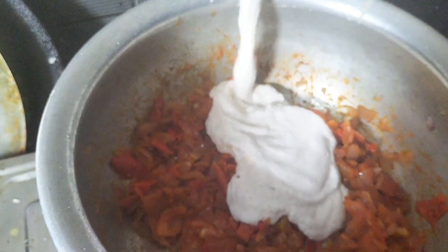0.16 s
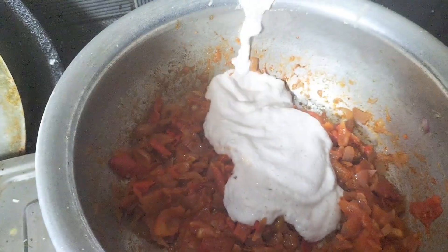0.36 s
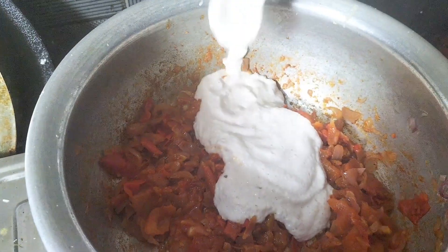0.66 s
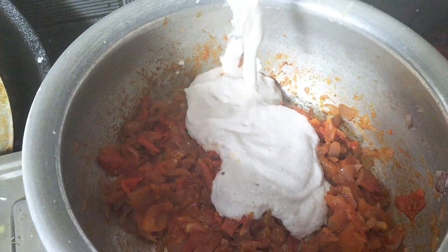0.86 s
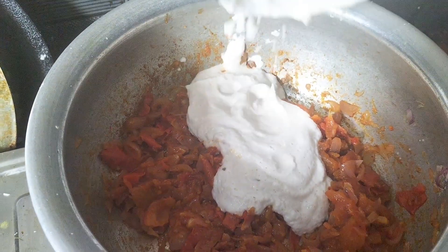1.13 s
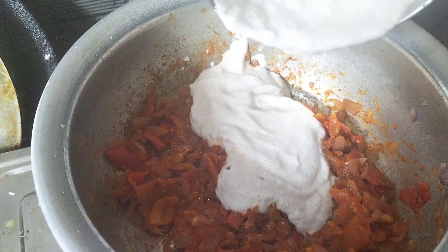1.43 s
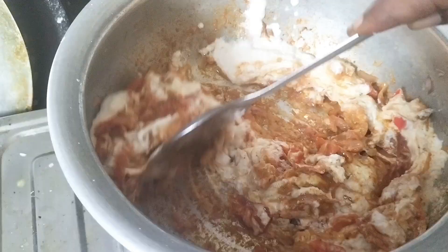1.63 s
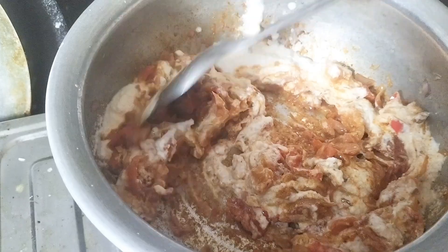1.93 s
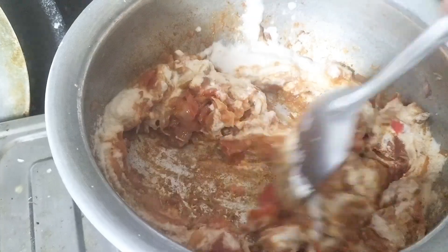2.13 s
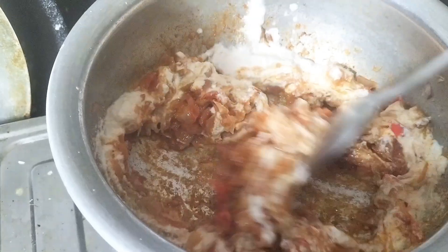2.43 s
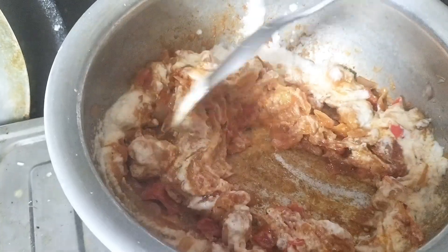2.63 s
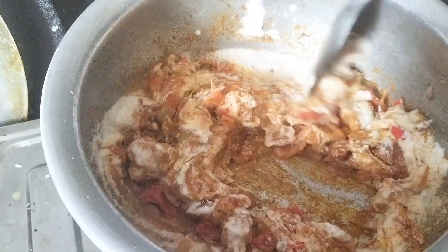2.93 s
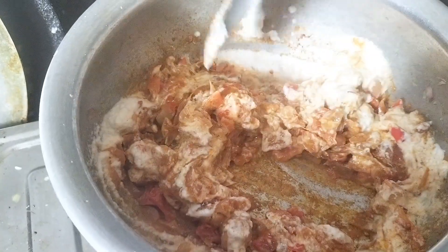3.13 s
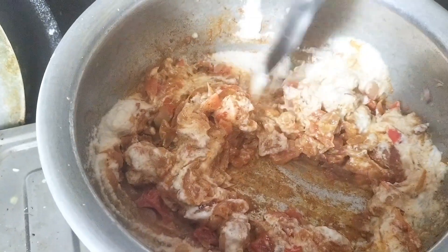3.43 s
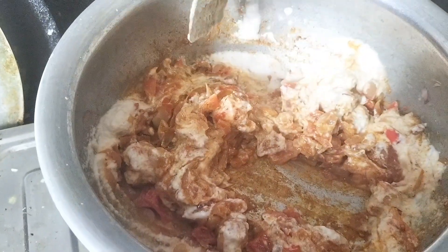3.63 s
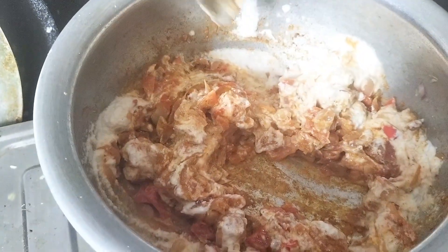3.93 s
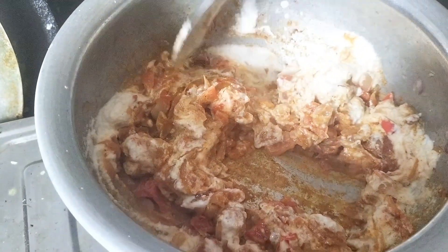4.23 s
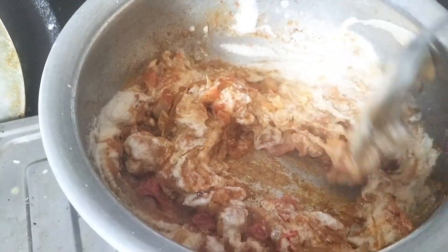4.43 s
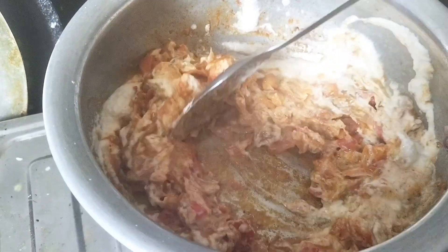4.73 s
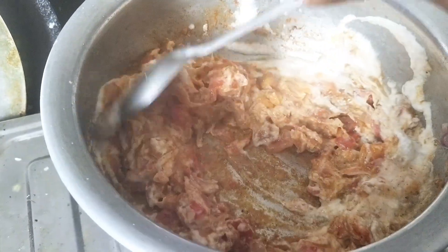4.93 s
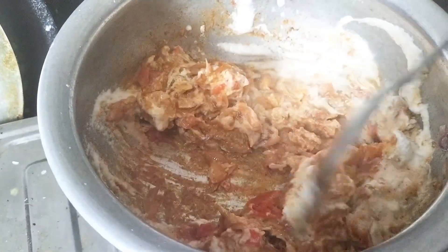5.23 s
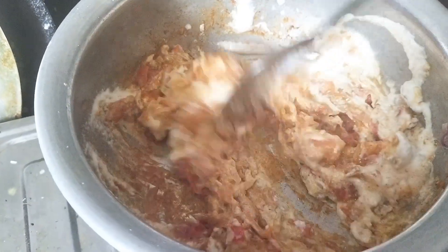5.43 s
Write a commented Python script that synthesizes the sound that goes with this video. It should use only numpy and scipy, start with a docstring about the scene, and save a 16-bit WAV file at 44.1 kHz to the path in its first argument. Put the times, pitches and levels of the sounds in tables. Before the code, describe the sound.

Steady fizzing oil with tiny bubbles opens the scene, smothered gradually by thick paste. A brief instant of dropout precedes the stirring. Then irregular spoon knocks, some muffled by food, some clear and ringing on the rim, mix with short rasps and tiny metallic squeaks. Hard kitchen walls add a short echo; close phone microphone, little deep bass.

```python
"""Paste smothering a sizzling pan

Coconut paste lands in a hot pan of oily masala: showers of tiny clicks fizz, bubble and slowly die down.
A steel spoon knocks on the aluminium pot, drags along the wall and is scraped clean on the rim.
Knocks are fading tones and noise; strokes and squeals are rubbing that sets metal ringing.
Food damps the ring, a small kitchen echoes the spoon, and a phone close by rounds the peaks."""
import sys
import numpy as np
from scipy import signal
from scipy.fft import rfft, irfft, next_fast_len
from scipy.io import wavfile
from scipy.ndimage import uniform_filter1d, map_coordinates

SR = 44100
rng = np.random.default_rng(int(sys.argv[2]) if len(sys.argv) > 2 else 0)


def digitize_waveform(pressure):
    """Quantize a signal to 16-bit integers and store it at the path in sys.argv[1].

    Rows of a 2-D input are taken as channels; values are limited to [-1, 1].
    """
    field = np.atleast_2d(pressure).T
    bounded = np.clip(field, -1, 1)
    quanta = np.round(bounded * 32767).astype(np.int16)
    wavfile.write(sys.argv[1], SR, quanta)


N = 245355
TIME = np.arange(N) / SR

# strength of the sizzle while the paste is poured and first turned over: time_s, level_db
SIZZLE_STRENGTH = [(0.0, -27), (0.03, -29), (0.08, -27), (0.38, -29), (0.79, -26), (1.11, -32),
                   (1.669, -34), (1.7, -33), (2.05, -36)]
# fine spray grows as the paste spreads over hot oil, then dies first: time_s, level_against_sizzle_db
SPRAY_STRENGTH = [(0, -17.5), (.88, -11.5), (1.8, -16), (3.8, -22.5)]
# loud spits of oil: start_s, relative_level_db
OIL_SPITS = [(0.084, -19), (0.12, -19), (0.202, -21), (0.496, -22.5), (0.792, -21), (0.862, -21)]
# colour of hot oil frying: frequency_hz, gain_db
FRYING_COLOUR = [(40, -38), (90, -31), (170, -16.5), (250, -24), (350, -11), (560, -16.5), (1040, -15.5),
                 (1210, -16.5), (1420, -17.5), (1950, -16), (3100, -3.5), (3950, 5.5), (4900, -1.5),
                 (6200, -4), (9500, -28.5), (11800, -24.5), (16000, -35)]
# colour of the quiet simmer under the paste: frequency_hz, gain_db
SIMMERING_COLOUR = [(40, -37), (90, -14.5), (215, -9.5), (330, 1.5), (560, -5), (1150, -9), (1850, -12.5),
                    (2700, -4), (4000, -3), (5700, -14), (7800, -26), (9700, -33), (11800, -34),
                    (16000, -36)]
# registers of spluttering, sizzle and fine spray: low_hz, high_hz
FRYING_BANDS = [(20, 2000), (2000, 7500), (7500, 20000)]
# borders between the registers that flare up on their own: frequency_hz
FLARE_BORDERS = [20, 700, 1500, 2600, 3500, 4500, 5800, 20000]
# spoon knocks: start_s, relative_level_db, paste_under_spoon (0-1), depth (0 rim - 1 bottom), thud_hz,
# after_ring_db, choke_s (extra t60 with which the food chokes the ring)
SPOON_KNOCKS = [(2.1115, -10, 0.76, 0.073, 992, -6, 0.47), (2.3933, -16, 0.23, 0.01, 1170, 3.5, 3.5),
                (2.402, -19.5, 0.39, .01, 1200, 4.5, 1.2), (2.46, -9, 0.63, 0.51, 703, 10.5, 0.16),
                (2.539, -18.5, 0.33, 0.36, 1050, 4, 0.12), (2.8543, -14.5, 0.12, 0.44, 1132, 8.5, 0.086),
                (2.911, -24.5, .15, 0.11, 1180, -1.5, 0.12), (2.931, -34, 0.17, 0.078, 1120, -17, .2),
                (3.2513, -16, 0.18, 0.16, 1125, 1.5, 9.5), (3.368, -18.5, 0.24, 0.9, 1140, 10, 3.6),
                (3.6237, -13.5, 0.2, 0.09, 1174, 1, 19), (4.01, -23, 0.35, 0.011, 1010, 5, 1.2),
                (4.2483, -12.5, 0.2, 0.2, 1120, 4, 0.7), (4.3089, -17.5, 0, 0.25, 1140, 4.5, 0.16),
                (4.3882, -27, 0.13, 0.32, 820, 6, .15), (4.416, -28, 0, 0.44, 1120, 6, 0.19),
                (4.4303, -15, 0.18, 0.29, 1140, 8, 0.75), (4.6203, -9.5, 0.36, 0.51, 1000, 2, 0.55),
                (4.709, -19.5, 0.22, 0.25, 630, 1.5, 0.064), (4.7439, -21, 0.68, 0.65, 662, -7, 0.23),
                (4.7787, -41.5, 0.45, 1, 500, 0, 0.25), (4.9953, -28, 0.45, 0.37, 365, 11, 0.56),
                (5.1, -40, 0.3, 0.94, 580, 20, 0.43), (5.3793, -8.5, 0.41, 0.51, 1144, -0.5, 0.52)]
# spoon strokes: start_s, length_s, relative_level_db, food_pushed (0-1), rasp_top_hz, chatter_hz,
# chatter_db, pot_ring_db
SPOON_STROKES = [(1.634, 0.056, -41, 1, 7040, 1050, 6, 5), (2.097, 0.1, -28, 0.91, 4060, 473, -5, -1.5),
                 (2.487, 0.043, -24.5, 0.42, 7300, 720, -16, -1),
                 (2.899, 0.064, -24.5, 0, 7000, 3850, 0, 8),
                 (2.935, 0.039, -27, 0.77, 6360, 1200, 1.5, 9.5),
                 (3.256, 0.15, -24.5, 0.41, 6500, 3100, -2.5, 16),
                 (3.32, 0.074, -22, 0.65, 6660, 4050, -3, 6), (3.967, 0.097, -28, 0.54, 5700, 3670, -1, -2),
                 (4.006, .04, -29, 0.26, 6460, 3390, 2.5, 7),
                 (4.259, 0.16, -25, 0.48, 6860, 1140, -2, 11.5),
                 (4.327, 0.15, -30.5, 0.38, 7400, 349.6, 3.5, 21),
                 (4.631, 0.092, -24.5, 0.7, 6900, 1145, -4, 7),
                 (4.996, 0.043, -31.5, 0, 6900, 1800, -3.5, 7), (5.109, 0.025, -28, 0.9, 5030, 3780, 5, 11),
                 (5.124, 0.056, -25.5, 0.61, 4630, 483.5, -6.5, 2),
                 (5.382, 0.09, -35, 0.77, 2480, 1585, 1.5, 24),
                 (5.42, 0.063, -23.5, 0.23, 5730, 3380, -8.5, -2.5)]
# squeals on bare metal: loudest_s, pitch_hz, relative_level_db, build_up_s, ring_t60_s
METAL_SQUEALS = [(2.537, 1165, -24, 0.0096, 0.039), (2.88, 362, -25.5, .012, 0.05),
                 (2.91, 328, -25, .012, 0.043), (3.385, 1415, -38, 0.032, 0.83),
                 (3.431, 2647, -38.5, 0.13, 0.28), (3.99, 1153, -30.5, 0.011, 0.18),
                 (4.014, 5795, -24, 0.0078, 0.28), (4.026, 1920, -18.5, 0.011, 0.17),
                 (4.314, 1152, -25, 0.011, 0.046), (4.36, 1166, -27.5, 0.021, 0.086),
                 (4.437, 1933, -28.5, 0.0066, .22)]
# partials of a squeal: multiple_of_pitch, level_db
SQUEAL_OVERTONES = [(1, 3.5), (2, -36)]
# colour of metal rubbing on metal: frequency_hz, gain_db
RUBBING_COLOUR = [(40, -29), (110, -73), (200, -7), (340, -4), (580, -6), (1130, 5.5), (1450, -0.5),
                  (2300, -4.5), (3900, -0.5), (6200, -7.5), (8000, -17.5), (9900, -28.5), (11800, -27.5),
                  (16000, -31)]
# ringing modes of pot and spoon: pitch_hz, relative_level_db, t60_s
POT_MODES = [(166.5, -3, 0.55), (331, 8, 0.48), (393.4, 1.5, 0.19), (414, -6, 0.5), (459, -2.5, 0.56),
             (481.6, -5.5, 0.34), (689.6, 2, 0.24), (759, 2, 0.45), (854, -9.5, 0.29), (1154, 1.5, 0.22),
             (1209, 1, 0.66), (1430, -8, 2.6), (1620, -10, 0.22), (1650, 2, 0.095), (1893, 2.5, 0.21),
             (2287, -10.5, 0.27), (2632, -7, 0.35), (3031, -3, 0.35), (3350, -14.5, 0.57),
             (3340, 2.5, 0.12), (3505, -2.5, 0.094), (3777, 3, 0.064), (4120, -9.5, 0.35), (4100, 8, 0.13),
             (4630, 0, 0.073), (4845, 6.5, 0.077), (5470, 0.5, 0.096), (5710, 4.5, 0.11), (6065, 7, 0.055),
             (6615, 2, 0.077), (7120, 1, 0.046), (8290, -6, 0.023)]
# bass, middle, treble and top of a knock: low_hz, high_hz
KNOCK_BANDS = [(100, 800), (800, 2200), (2200, 5000), (5000, 20000)]

# once it is stirred in, the sizzle dies away to a steady simmer
SMOTHER_DB_PER_S, SIMMER_DB = 11.5, -50
# low spluttering: its level against the sizzle, and what stays of it in the simmer
SPLUTTER_DB, SIMMER_SPLUTTER_DB = -8, -47.5
# steam bubbles through the edge of the paste on one wavering note
# (bend is a share of its pitch, dB is against the fizz)
BUBBLING_HZ, BUBBLING_T60_S, BUBBLING_BEND, BUBBLING_DB = 1200.4, 0.14, .035, -16
# each register of the sizzle flares up on its own
FLARE_DB, FLARE_PER_S = 1.7, 22

# tone of a knock: (bass, middle, treble, top) on the bare rim, and what full paste and full depth add
RIM_DB, PASTE_DB, DEPTH_DB = (-20, -17.5, 6.5, 0), (-9.5, 5, -13.5, -61), (25.5, 10, -21.5, 6)
# shifts of after-ring and squelch: (on the rim, at the bottom)
RING_DB, SQUELCH_DB = (9.5, -4), (-22, -6)
# wet, noisy share of a knock: (on bare metal, in thick paste)
WET_DB = (-9, -1)
# paste under the spoon cushions the blow: highest pitch on bare metal, octaves lost in thick paste
BARE_TOP_HZ, CUSHION_OCTAVES = 17000, 2.1
# the place of contact favours some modes over others (either way)
PLACE_DB = 3.5
# a load on the wall pulls each mode off its free pitch: largest share of the pitch,
# and the choke time above which the pot rings freely
LOAD_DETUNE, FREE_RING_S = .04, .7

# parts of a stroke against its rasp: (on bare metal, with a full spoon)
GRIT_DB, RUMBLE_DB = (-3.5, -17), (-22, 4)
# ringing pot against dry rubbing, before each stroke's own setting: (rasp, grit, rumble)
STROKE_RING_DB = (-4, -3, -7)
# pressure builds for this share of a stroke, then lets go; the hand judders
PRESS_SHARE, JUDDER_DB, JUDDER_PER_S = 0.47, 1, 114.8
# a chattering note lasts longer the lower it is (t60 at 1 kHz) and bends by a share of its pitch
CHATTER_T60_S, CHATTER_BEND = .09, .025
# the spoon's edge catches on burnt-on bits (dB is before the rubbing colour)
CATCHES_PER_S, CATCH_DB = 170, -5.5
# with a full load, the ring wavers by this share of its pitch as the point of contact slides
SLIDE_BEND, SLIDE_PER_S = .025, 35
SQUEAL_FALL_S = 0.0035

# the sound drops out briefly
GAP_START_S, GAP_END_S = 1.6185, 1.628
# highest pitch the phone lets through
TOP_HZ = 16200


def frying():
    """Steam bursts in the oil: fizz, crisp bubbles, a bubbling note and spits; stirring changes its colour."""
    fizz = level(clicks(rate=11000, spread_db=2), 0)
    crisp = level(bubbles(rate=700, low_hz=2930, high_hz=6250), -10.0)
    note = convolve(clicks(rate=270, spread_db=3.5), mode(BUBBLING_HZ, BUBBLING_T60_S))
    bubbling = level(bend(note, BUBBLING_BEND, rate=14), BUBBLING_DB)
    source = flare(fizz + crisp + bubbling)
    smothered = np.interp(TIME, [2.2, 3.8], [0, 1])
    hot = level(colour(source, FRYING_COLOUR), 0)
    simmer = level(colour(source, SIMMERING_COLOUR), 0)
    sound = (1 - smothered) * hot + smothered * simmer
    out = np.zeros(N)
    for edges, gain in zip(FRYING_BANDS, frying_levels()):
        part = band(sound, *edges)
        # even out the loudness over 0.2 s, then follow the wanted level
        loudness = np.sqrt(uniform_filter1d(part ** 2, SR // 5))
        out += part / loudness * gain
    for start, db in OIL_SPITS:
        spit = band(colour(burst(t60=0.031), FRYING_COLOUR), 1900, 6900)
        add(out, start, undb(db + 18.5) * unit(spit))
    return out


def frying_levels():
    """Gains of spluttering, sizzle and fine spray: all follow how much wet paste meets hot oil."""
    s, db = np.transpose(SIZZLE_STRENGTH)
    smother_db = SMOTHER_DB_PER_S * np.maximum(TIME - s[-1], 0)
    boil = undb(np.interp(TIME, s, db) - smother_db)
    sizzle = np.hypot(boil, undb(SIMMER_DB))
    splutter = np.hypot(boil * undb(SPLUTTER_DB), undb(SIMMER_SPLUTTER_DB))
    spray = sizzle * undb(np.interp(TIME, *np.transpose(SPRAY_STRENGTH)))
    return splutter, sizzle, spray


def bubbles(rate, low_hz, high_hz, count=7):
    """Bubbles of many sizes, each ringing for a few cycles as it bursts."""
    pitches = np.geomspace(low_hz, high_hz, count)
    return sum(convolve(clicks(rate / count, spread_db=-0.5), unit(mode(hz, t60=20 / hz))) for hz in pitches)


def flare(x):
    """Let each register of the sizzle swell and sink by itself."""
    size = next_fast_len(N)
    spectrum, hz = rfft(x, size), np.fft.rfftfreq(size, 1 / SR)
    out = np.zeros(N)
    for lo, hi in zip(FLARE_BORDERS, FLARE_BORDERS[1:]):
        register = irfft(spectrum * ((hz >= lo) & (hz < hi)), size)[:N]
        out += register * undb(FLARE_DB * walk(rate=FLARE_PER_S))
    return out


def knocks():
    """Each blow clanks, thuds, squeezes wet paste and rings the pot; paste dulls it, depth adds bass."""
    out = np.zeros(N)
    for start, db, paste, depth, thud_hz, after_db, choke_s in SPOON_KNOCKS:
        band_db = db + np.array(RIM_DB) + paste * np.array(PASTE_DB) + depth * np.array(DEPTH_DB)
        wet_db = blend(paste, WET_DB)
        ring_db = after_db + blend(depth, RING_DB)
        squelch_db = wet_db + blend(depth, SQUELCH_DB)
        load = max(1 - choke_s / FREE_RING_S, 0)
        # spoon and wall vibrate together only while they touch
        touch = unit(pot_ring(scatter_db=5, load=load) * fade(.032))
        wet = unit(colour(burst(t60=.026) * (1 - fade(.003)), RUBBING_COLOUR))
        clank = touch + undb(wet_db) * wet
        thud_db = band_db[0] if thud_hz < KNOCK_BANDS[0][1] else band_db[1]
        thud = unit(mode(thud_hz, t60=.024) * (1 - fade(.004))) * undb(thud_db)
        squeeze = burst(t60=.18)
        squeeze = squeeze * undb(2 * walk(rate=390, size=len(squeeze)))
        squelch = unit_bands(colour(squeeze, RUBBING_COLOUR), np.add(band_db, (-20.0, 5.0, 16.5, 15.5)))
        ring = pot_ring(scatter_db=PLACE_DB, load=load, band_db=band_db) * fade(choke_s)
        blow = undb(22.5) * unit_bands(clank, band_db) + undb(30.5) * thud
        blow = blow + undb(squelch_db + 24.0) * squelch + undb(ring_db - 20.5) * ring
        add(out, start, band(blow, 7.5, BARE_TOP_HZ / 2 ** (CUSHION_OCTAVES * paste)))
    return out


def unit_bands(x, band_db):
    """Give the bass, middle, treble and top of a short sound their own energies."""
    return sum(unit(band(x, *edges)) * undb(db) for edges, db in zip(KNOCK_BANDS, band_db))


def pot_ring(scatter_db, load, band_db=(0, 0, 0, 0)):
    """The pot's modes, weighted anew for each contact and detuned by the load on the wall (0-1)."""
    hz, db, t60 = np.transpose(POT_MODES)
    gain, side, pull = rng.uniform(-1, 1, (len(POT_MODES), 3)).T
    push_db = np.interp(np.log(hz), np.log([500, 1300, 3300, 6000]), band_db)
    weights = np.sign(side) * undb(db + push_db + scatter_db * gain)
    pitches = hz * (1 + LOAD_DETUNE * load * pull)
    return sum(w * mode(f, decay) for w, f, decay in zip(weights, pitches, t60))


def strokes():
    """The spoon's edge sticks and slips: rasp, grit, rumble and chatter; food trades grit for rumble."""
    out = np.zeros(N)
    slips = level(clicks(rate=8000, spread_db=1.8), 0) * undb(2.2 * walk(rate=250))
    slips = slips[:SR]
    catches = level(clicks(rate=CATCHES_PER_S, spread_db=5.0), CATCH_DB)[:SR]
    rubbing = sliding_metal(patchy_db=7.5, size=SR) + undb(-9) * slips + catches
    rubbing = colour(rubbing, RUBBING_COLOUR)
    t = TIME[:SR // 3]
    for start, length, db, food, top_hz, chatter_hz, chatter_db, pot_db in SPOON_STROKES:
        pressure = np.interp(t / length, [0, min(PRESS_SHARE, .95), 1], [0, 1, 0]) ** 0.67
        pressure = pressure * undb(JUDDER_DB * walk(rate=JUDDER_PER_S, size=len(t)))
        # each stroke uses a random stretch of the rubbing
        place = rng.integers(SR - len(t))
        push = slips[place:place + len(t)] * pressure
        rub = rubbing[place:place + len(t)] * pressure
        ringing = convolve(push, pot_ring(scatter_db=PLACE_DB, load=food ** 2) * fade(0.44))
        ringing = bend(ringing, SLIDE_BEND * food ** 2, rate=SLIDE_PER_S)
        # each register is part dry rubbing, part ringing pot
        registers = []
        for (lo, hi), ring_db in zip([(1800, top_hz), (6000, 16000), (140, 1500)], STROKE_RING_DB):
            pot = undb(ring_db + pot_db) * unit(band(ringing, lo, hi))
            registers.append(unit(unit(band(rub, lo, hi)) + pot))
        rasp, grit, rumble = registers
        # a duller rasp has less grit
        grit = grit * top_hz / 7000
        chatter_t60 = CHATTER_T60_S * np.sqrt(1000 / chatter_hz)
        chatter = convolve(push, mode(chatter_hz, t60=chatter_t60))
        chatter = unit(band(chatter, chatter_hz / 2, chatter_hz * 2))
        chatter = bend(chatter, CHATTER_BEND, rate=72.4)
        stroke = rasp + undb(blend(food, GRIT_DB)) * grit
        stroke = stroke + undb(blend(food, RUMBLE_DB)) * rumble + undb(chatter_db) * chatter
        add(out, start, undb(db) * np.linalg.norm(pressure) * stroke)
    return out


def sliding_metal(patchy_db, count=56, size=44100):
    """As the contact slides, narrow resonances of spoon and wall swell and sink, each on its own."""
    out = 0
    for hz in np.geomspace(280, 13000, count) * rng.uniform(.98, 1.02, count):
        width_hz = 35 + hz / 70
        resonance = signal.lfilter(*signal.iirpeak(hz, hz / width_hz, fs=SR), rng.standard_normal(size))
        out = out + resonance * np.sqrt(hz / width_hz) * undb(patchy_db * walk(rate=36, size=size))
    return level(out, 0)


def squeal():
    """For a moment the slips lock to one pitch and sing; it rings on after the spoon lets go."""
    t = TIME[:SR // 3]
    out = np.zeros(N)
    for loudest, hz, db, rise_s, ring_s in METAL_SQUEALS:
        pressure = np.interp(t - rise_s, [-rise_s, 0, SQUEAL_FALL_S], [0, 1, 0])
        wavering_hz = hz * (1 + .007 * walk(rate=300, size=len(t)))
        phase = 2 * np.pi * np.cumsum(wavering_hz) / SR
        for multiple, partial_db in SQUEAL_OVERTONES:
            slip = pressure * np.sin(multiple * phase)
            sung = unit(unit(slip) + unit(convolve(slip, mode(multiple * hz, t60=ring_s))))
            add(out, loudest - rise_s, sung * np.linalg.norm(pressure) * undb(db + partial_db))
    return out


def kitchen(x):
    """Hard walls close by: a short diffuse tail, duller than the direct sound."""
    tail = burst(t60=.33)
    # the first echo arrives after 4 ms
    tail = tail * np.clip((TIME[:len(tail)] - .004) / 0.0047, 0, 1)
    tail_colour = [(100, -22.0), (400, 4.5), (1500, -3.5), (4000, -10.0), (8000, -10.0), (16000, -10)]
    tail = colour(unit(tail), tail_colour)
    return x + undb(-4.0) * convolve(x, tail)


def mode(hz, t60):
    """One ringing resonance."""
    decay = fade(t60)
    return decay * np.sin(2 * np.pi * hz * TIME[:len(decay)])


def burst(t60):
    """Crowded resonances dying together, made as fading noise."""
    decay = fade(t60)
    return decay * rng.standard_normal(len(decay))


def fade(t60, size=18000):
    """Exponential decay, 60 dB in t60 seconds, cut off after about 0.4 s."""
    return np.exp(-np.log(1000) * TIME[:size] / t60)


def clicks(rate, spread_db):
    """Random tiny impulses of scattered strength, about rate of them per second."""
    size = undb(spread_db * np.minimum(rng.exponential(size=N), 6))
    return (rng.random(N) < rate / SR) * size * rng.choice([-1, 1], N)


def walk(rate, size=N):
    """Slow random wander with a spread near one, taking rate new values per second."""
    knots = rng.standard_normal(size // 10)
    return np.interp(TIME[:size] * rate, np.arange(len(knots)), knots)


def bend(x, share, rate):
    """Let the pitch of a sound wander by a share of itself."""
    at = np.arange(len(x))
    return map_coordinates(x, [at + np.cumsum(share * walk(rate, size=len(x)))], mode="mirror")


def colour(x, points, size=2048):
    """Causal filter through (Hz, dB) points, built from the cepstrum."""
    hz, db = np.transpose(points)
    grid = np.maximum(np.arange(size // 2 + 1) * SR / size, 1)
    cepstrum = irfft(np.log(undb(np.interp(np.log(grid), np.log(hz), db))))
    # folding the second half onto the first makes the filter respond without delay
    cepstrum[1:size // 2] *= 2
    cepstrum[size // 2 + 1:] = 0
    return convolve(x, irfft(np.exp(rfft(cepstrum))))


def band(x, lo_hz, hi_hz):
    """Band-pass filter."""
    edges = [lo_hz, min(hi_hz, SR / 2 - 10)]
    return signal.sosfilt(signal.butter(3, edges, "band", fs=SR, output="sos"), x)


def convolve(x, response):
    """Play x through a response."""
    return signal.fftconvolve(x, response)[:len(x)]


def undb(db):
    """Decibels to gain."""
    return 10 ** (np.asarray(db) / 20)


def unit(x):
    """Scale to an energy of one."""
    return x / np.sqrt(np.sum(x ** 2) + 1e-18)


def level(x, db):
    """Scale to an average (rms) level."""
    return unit(x) * np.sqrt(len(x)) * undb(db)


def blend(share, ends):
    """Value a share of the way between two ends."""
    return np.interp(share, [0, 1], ends)


def add(out, s, x):
    """Mix x into out, starting at s seconds."""
    i = int(s * SR)
    out[i:i + len(x)] += x[:len(out) - i]


def scene():
    """Frying under the spoon work; the pot is too small to radiate deep bass."""
    spoon = band(knocks() + undb(-2.0) * strokes() + squeal(), 239, 24000)
    return (frying() + kitchen(spoon))[None]


def record(dry):
    """The phone rounds the peaks and cuts deepest bass and top; the sound drops out for an instant."""
    ceiling = 1.2
    sound = band(ceiling * np.tanh(dry / ceiling), 45, 21000)
    in_gap = (TIME > GAP_START_S) & (TIME < GAP_END_S)
    sound = sound * np.where(in_gap, undb(-33.5), 1)
    return signal.sosfilt(signal.ellip(8, .2, 70, TOP_HZ, fs=SR, output="sos"), sound)


dry = scene()
out = record(dry)
digitize_waveform(out)
```